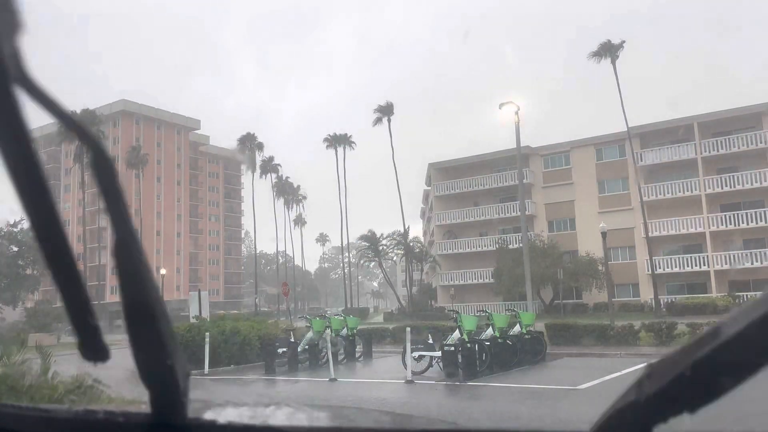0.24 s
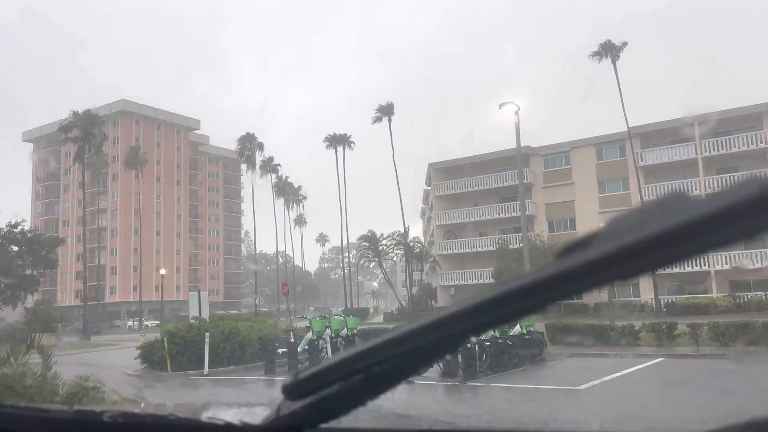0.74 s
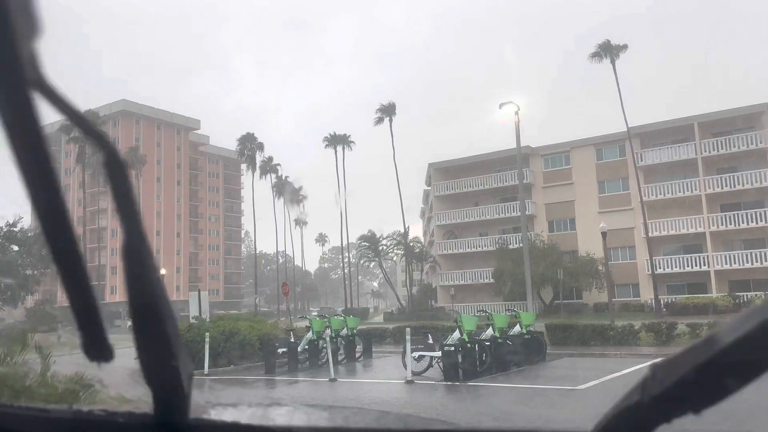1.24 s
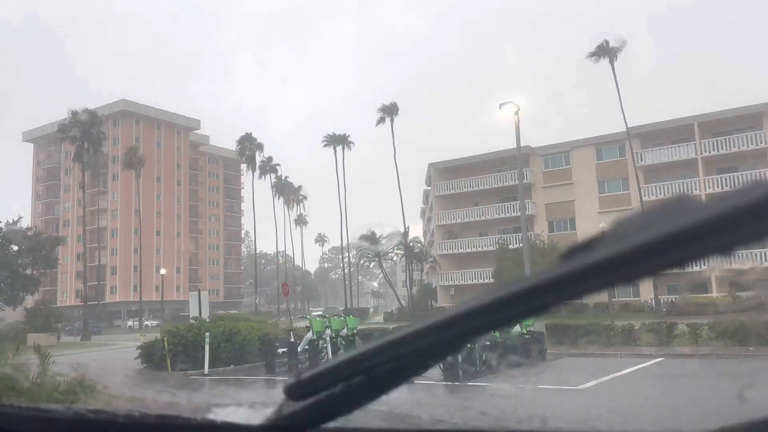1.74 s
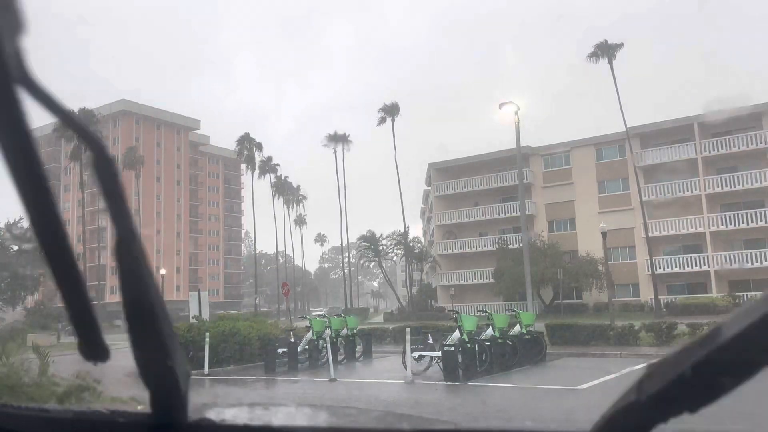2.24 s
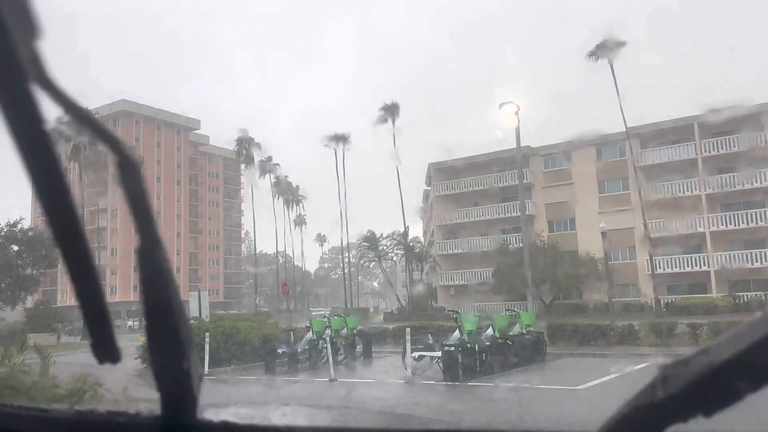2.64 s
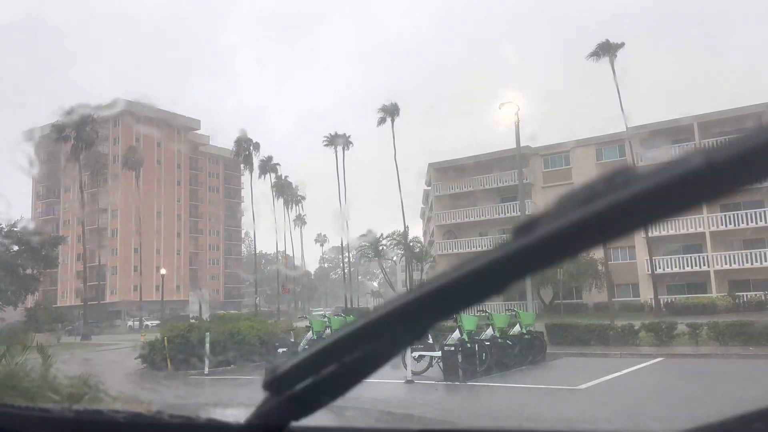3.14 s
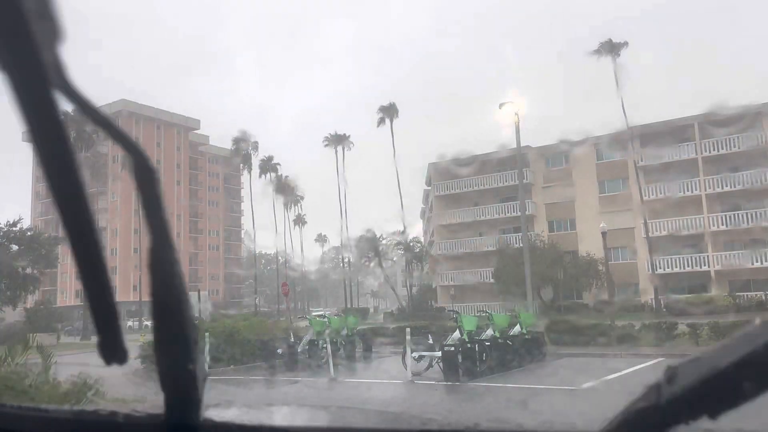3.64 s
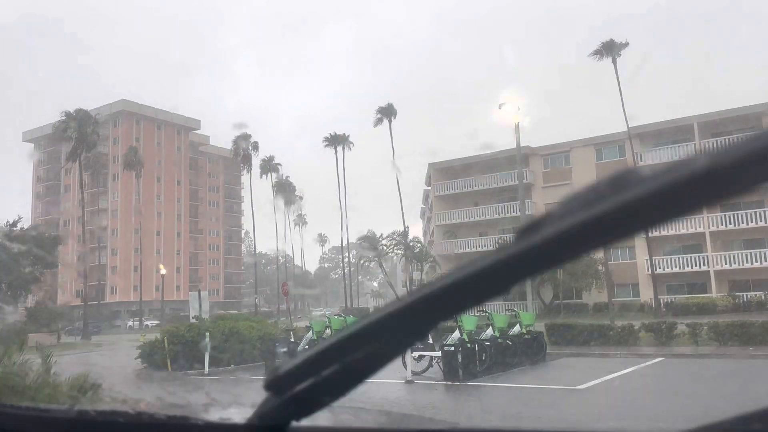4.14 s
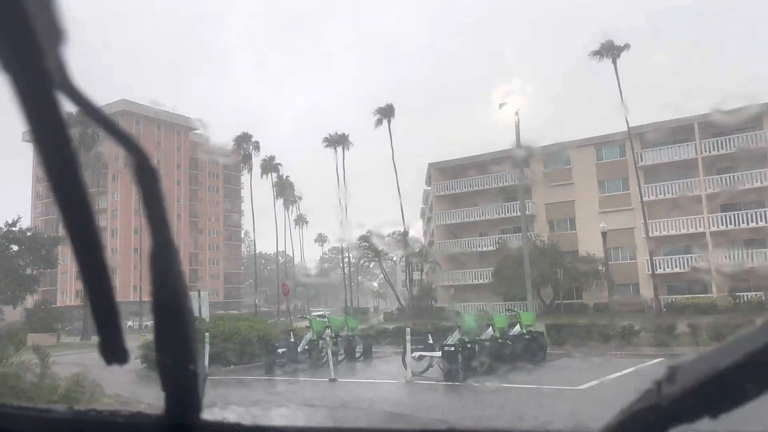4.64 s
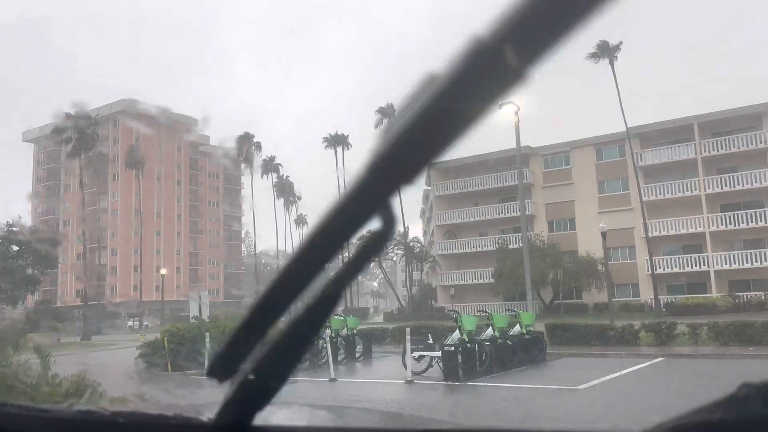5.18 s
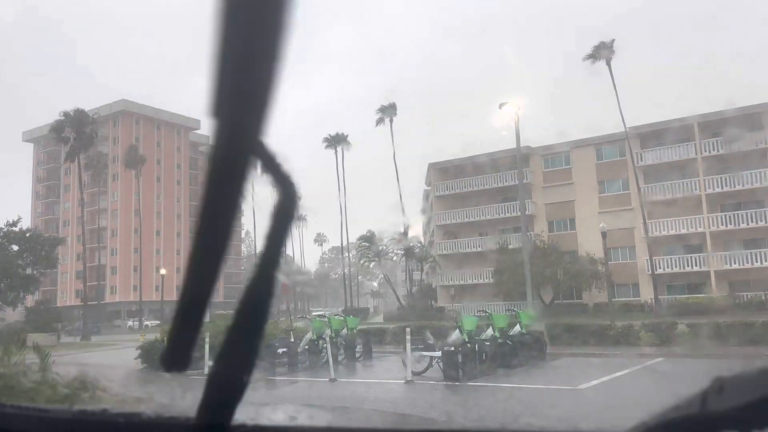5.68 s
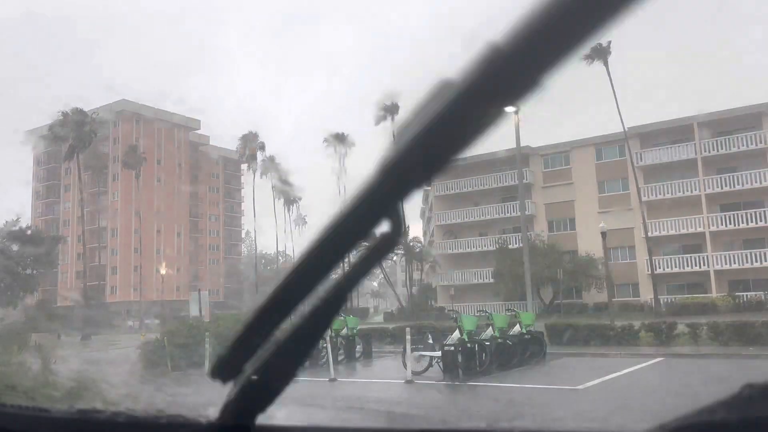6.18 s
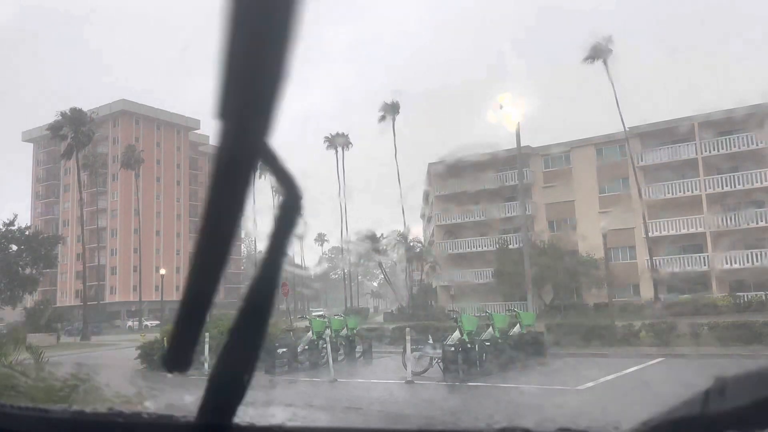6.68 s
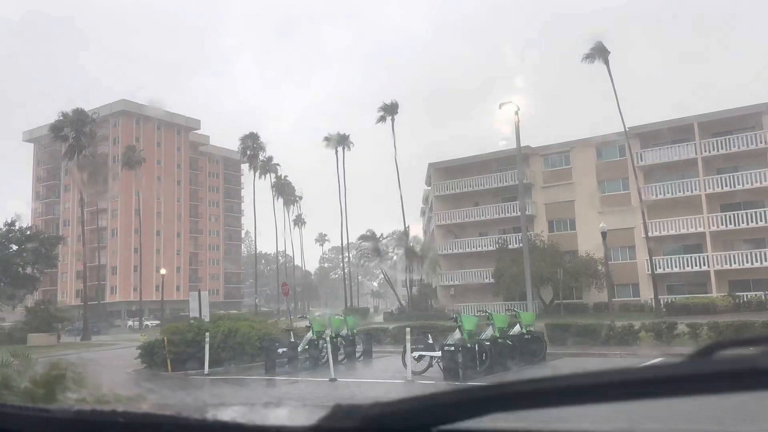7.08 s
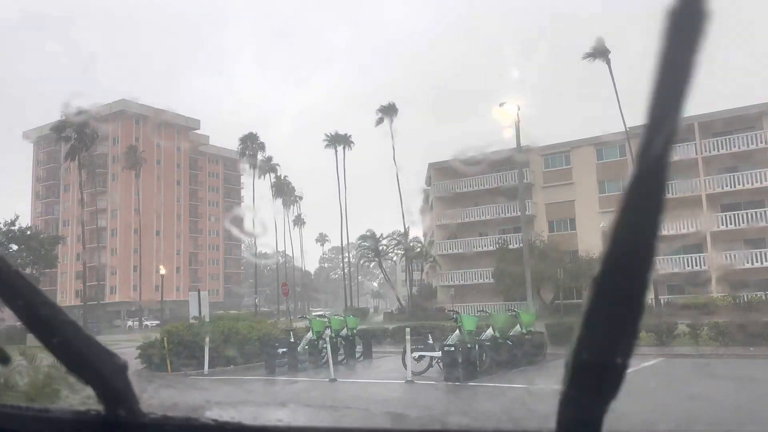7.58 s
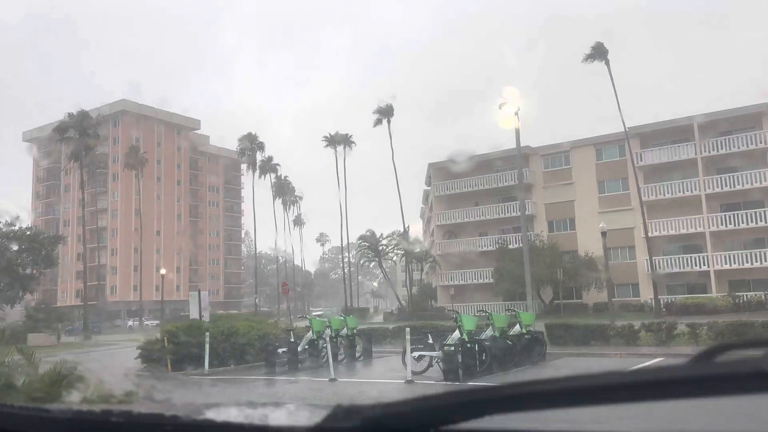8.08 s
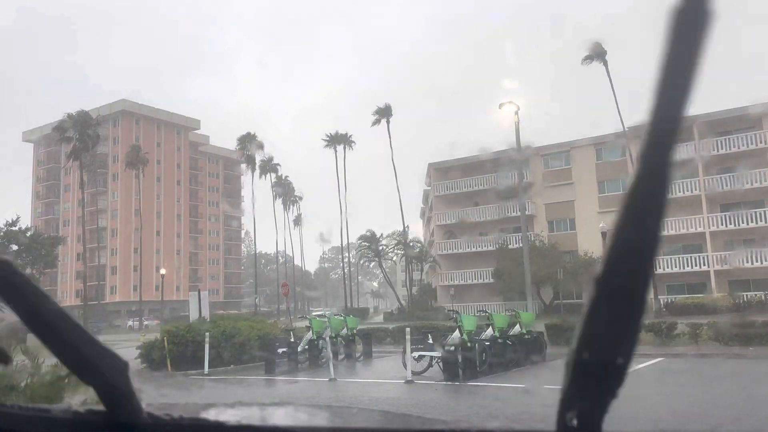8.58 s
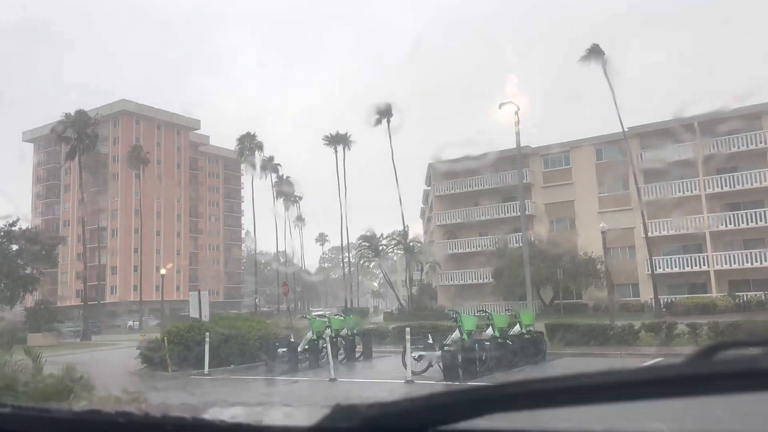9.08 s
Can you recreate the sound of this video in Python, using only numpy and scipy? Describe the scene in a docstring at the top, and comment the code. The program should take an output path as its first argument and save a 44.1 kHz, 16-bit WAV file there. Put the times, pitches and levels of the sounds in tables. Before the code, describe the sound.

Heavy rain is heard from inside a parked car for about nine seconds. A deep, steady drumming on the roof lies under a dense patter and soft hiss on the windshield, swelling slightly in gusts. Bigger drops tick on the glass at irregular moments, most thickly from 3 to 4 seconds, and some give short, light metallic pings. The wipers run the whole time, one cycle per second, with a low motor hum and shudder that rise in the middle of each sweep. The two blades turn at the top with a quick, dull double knock at about 0.5 seconds, 1.5 seconds and every second after, softer near 7.5 seconds. They land at the bottom with a rubbery thud at about 1 second, 2 seconds and so on until 9. The knocks stand out above the rain, and the whole sound is close and enclosed.

```python
"""Heavy rain drumming on the roof of a parked car, heard from inside, with wipers sweeping once a second.
Countless drops keep the roof's low modes sounding. On the windshield, fine rain hisses in gusts and
single drops tick and ring; some ping a thin panel, and a reedy band drifts in the drumming.
The wiper drive hums and shudders through the body. The blades knock as they reverse at the top,
then land with a rubber thud at the bottom."""
import sys
import numpy as np
from scipy import signal
from scipy.io import wavfile
from scipy.ndimage import uniform_filter1d

SR = 44100
rng = np.random.default_rng(int(sys.argv[2]) if len(sys.argv) > 2 else 0)


def dump(signal):
    """Clip the signal to [-1, 1] and save it as 16-bit WAV at the path in sys.argv[1]."""
    limited = np.clip(np.atleast_2d(signal).T, -1, 1)
    pcm = np.round(limited * 32767).astype(np.int16)
    wavfile.write(sys.argv[1], SR, pcm)


N = 411012
SWEEP_S = 0.99975  # one wiper cycle, up and down


# Roof and cabin spectrum: freq_hz, relative_db
ROOF_SPECTRUM = [(33, -40), (48, 0), (72, -7.5), (91, -13), (114, 2.5), (129, -1), (139, -1.5), (170, -7),
                 (198, -2), (233, -1), (280, -12), (340, -32), (450, -57), (800, -120)]

def roof_drumming():
    """Countless drops drive the low roof and cabin modes; the level swells once a sweep, just after the blades
    land."""
    size, frames = 4096, N // 1024 + 5
    hz, t = np.fft.rfftfreq(size, 1 / SR), np.arange(N) / SR
    field_db = at_freq(ROOF_SPECTRUM, hz) + 1.55 * smooth_noise(len(hz), frames, wide=3, long=2)
    drumming = unit_rms(stereo_noise(field_db, size)[:, :N])
    wobble = smooth_noise(1, frames * 2, wide=1, long=4)[0]
    wobble_db = 0.68 * np.interp(t, np.arange(frames * 2) * size / 8 / SR, wobble)
    swell_db = np.cos(2 * np.pi * (t - 0.17) / SWEEP_S)
    return amp(-27 + 0.071 * gust_db(t) + swell_db + wobble_db) * drumming


# Drive hum over one sweep: time_s, level_db, pitch_hz
HUM_CURVE = [(0.0, -46.0, 46.9), (0.12, -33.0, 48.5), (0.25, -39.0, 47.5), (0.37, -29.0, 49.9),
             (0.5, -24.0, 49.4), (0.62, -27.0, 46.8), (0.74, -32.0, 47.8), (0.87, -35.0, 46.4),
             (0.99, -40.0, 54.9)]
# Body shudder over one sweep: time_s, level_db, pitch_hz
SHUDDER_CURVE = [(0.0, -39.0, 59.0), (0.21, -32.0, 59.0), (0.35, -36.0, 51.0), (0.43, -29.0, 68.5),
                 (0.5, -39.0, 49.6), (0.57, -27.0, 58.3), (0.64, -26.0, 58.3), (0.71, -39.0, 56.7),
                 (0.78, -47.0, 70.7)]
# Strength of each sweep: hum_gain_db, shudder_gain_db, thud_gain_db
SWEEP_GAINS = [(-8, 1, -21), (-0.5, -1, -13.5), (0, 0, -13.5), (0.5, -1, -14), (0.5, 0.5, -16.5),
               (-1, 0.5, -28), (-1, 0, -16.5), (0.5, 1.5, -25), (-1, 0, -15), (-0.5, 1.5, -17)]

def wiper_sweeps():
    """The drive labours over a steady low tone; soft rubber thuds at the bottom of each sweep."""
    out = amp(-53) * np.sin(2 * np.pi * 24.01 * np.arange(N) / SR)
    hum, shudder = drone(HUM_CURVE), drone(SHUDDER_CURVE)
    t = np.arange(-2000, 2000) / SR  # centred on the thud's peak
    envelope = np.exp(-(t / 0.0042) ** 2) + 0.21 * np.exp(-(t / 0.037) ** 2)
    thud = envelope * np.cos(2 * np.pi * 106 * t)
    for sweep, (hum_db, shudder_db, thud_db) in enumerate(SWEEP_GAINS):
        cycle_s = sweep * SWEEP_S
        add(out, cycle_s - 0.39775, amp(hum_db) * hum)
        add(out, cycle_s - 0.32975, amp(shudder_db) * shudder)
        add(out, cycle_s + 0.058 + t[0], amp(thud_db) * thud)
    return out


def drone(curve):
    """One sweep of a wavering low tone."""
    time_s, level_db, pitch_hz = np.transpose(curve)
    t = np.arange(0, time_s[-1], 1 / SR)
    cycles = np.cumsum(np.interp(t, time_s, pitch_hz)) / SR
    envelope = np.interp(t, time_s, amp(level_db)) * signal.windows.tukey(len(t), 0.05)
    return envelope * np.sin(2 * np.pi * cycles)


# Two blades reversing at the top, one just after the other: start_s, level_db, pitch_hz
REVERSALS = [(0.431, -25, 221), (0.474, -19, 210), (1.441, -22, 197), (1.475, -22, 202), (2.449, -30, 247),
             (2.49, -18, 215), (3.457, -18.5, 192), (3.482, -17.5, 216), (4.429, -19, 232),
             (4.467, -29, 226), (5.427, -20, 231), (5.473, -18, 216), (6.453, -19, 211), (6.482, -23, 222),
             (7.44, -29, 224), (7.483, -31, 207), (8.439, -31, 200), (8.469, -20, 205)]
# Modes of a reversal: pitch_ratio, relative_db, t60_s
REVERSAL_MODES = [(1, 4, 0.08), (1.45, -8.5, 0.03)]
# Blades landing at the bottom: start_s, level_db
LANDINGS = [(0.997, -22), (1.999, -20), (3, -17), (4.004, -18.5), (4.997, -25), (6.002, -17.5),
            (7.002, -20.5), (8.005, -19.5), (9, -21.5)]
# Modes of a landing: pitch_ratio, relative_db, t60_s
LANDING_MODES = [(1, -3.5, 0.11), (1.6, -5.5, 0.046), (0.53, -4.5, 0.1)]

def blade_knocks():
    """Reversals jolt the body sharply; a landing blade settles slowly and its pitch sags."""
    out = np.zeros(N)
    for start_s, level_db, pitch_hz in REVERSALS:
        add(out, start_s, amp(level_db) * knock(REVERSAL_MODES, pitch_hz, rise_s=0.0016, sag=0))
    for start_s, level_db in LANDINGS:
        add(out, start_s, amp(level_db) * knock(LANDING_MODES, pitch_hz=234.4, rise_s=0.013, sag=0.18))
    return out


def knock(modes, pitch_hz, rise_s, sag):
    """Damped modes after one jolt, at peak 1."""
    t = np.arange(4000) / SR
    phase = 2 * np.pi * pitch_hz * np.cumsum(1 - sag * np.tanh(t / 0.042)) / SR
    ring = sum(amp(db - 60 * t / t60_s) * np.sin(ratio * phase) for ratio, db, t60_s in modes)
    ring *= 1 - np.exp(-t / rise_s)
    return ring / abs(ring).max()


# Rain strength on the glass: time_s, relative_db
GUSTS = [(0.0, -55), (0.93, -55), (1.14, -54), (1.35, -51), (1.53, -52.5), (1.95, -53.5), (2.4, -50),
         (2.55, -52), (2.9, -50), (3.4, -50), (3.9, -52.5), (4.02, -50.5), (4.15, -52.5), (4.49, -53),
         (4.88, -51.5), (5.11, -52.5), (5.3, -54.5), (5.73, -54.5), (6.02, -49), (6.33, -52.5), (6.55, -50),
         (6.88, -51), (7.21, -52.5), (7.71, -51), (7.95, -53), (8.36, -54), (8.88, -52.5), (9.05, -52),
         (9.32, -52.5)]

def gust_db(t):
    """Rain strength at times t, about its mean."""
    level_db = np.interp(t, *np.transpose(GUSTS))
    return level_db - level_db.mean()


# Spectrum of rain on glass: freq_hz, relative_db
GLASS_SPECTRUM = [(180, -36), (300, -1), (540, -6), (616, -5), (1050, -13.5), (1300, -7), (1800, -15),
                  (2250, -26), (2490, -22), (3930, -32.5), (5930, -37), (9350, -51), (10100, -55),
                  (22000, -120)]
# Cabin peaks and notches: centre_hz, width_hz, gain_db
CABIN_BANDS = [(824, 69, 3.5), (1060, 98, -1), (1350, 69, -1), (1528, 157, 3), (1743, 21, 1.5),
               (2304, 40, -10.5), (2410, 90, 2.5), (2870, 65, -2.5), (3110, 82, -1.5), (5570, 380, -2),
               (8650, 190, -3.5), (9560, 130, 4)]

def glass_db(hz):
    """Colour of rain on the glass as the cabin shapes it."""
    cabin_db = sum(db * np.exp(-((hz[:, None] - centre) / width) ** 2) for centre, width, db in CABIN_BANDS)
    return at_freq(GLASS_SPECTRUM, hz) + cabin_db


# Response of the hiss to gusts: freq_hz, gust_share
GUST_RESPONSE = [(400, 0.12), (1300, 0.59), (3000, 0.98), (9000, 0.97)]

def glass_hiss():
    """Fine rain blurs into hiss; squalls lift the treble most and flutter over wide bands."""
    size, frames = 512, N // 128 + 5
    hz, t = np.fft.rfftfreq(size, 1 / SR), np.arange(frames) * size / 4 / SR
    flutter_db = smooth_noise(1, frames, wide=1, long=9)
    band_flutter_db = 0.83 * smooth_noise(len(hz), frames, wide=30, long=6)
    squall_db = at_freq(GUST_RESPONSE, hz) * (gust_db(t) + flutter_db + band_flutter_db)
    drift_db = 1.05 * smooth_noise(len(hz), frames, wide=5, long=40)  # rain wanders across panels
    hiss = stereo_noise(glass_db(hz) + squall_db + drift_db, size)[:, :N]
    return amp(-35) * unit_rms(hiss)


# Decay of glass and cabin after a drop: freq_hz, t60_s
GLASS_DECAY = [(400, 0.12), (1500, 0.051), (4000, 0.077), (9000, 0.081)]
# Biggest drops on the glass: start_s, tick_db, ring_db
BIG_DROPS = [(0.983, -47, -36), (1.1927, -54, -44), (1.2316, -54, -42), (1.3633, -50, -42),
             (1.477, -55, -41), (1.8981, -48, -44), (2.1086, -51, -42), (2.2094, -53, -42),
             (2.6249, -50, -42), (2.8374, -55, -42), (2.958, -48, -34), (3.1303, -52, -42),
             (3.1537, -54, -42), (3.3638, -43, -32), (3.3852, -47, -42), (3.6027, -52, -42),
             (3.6984, -57, -34), (3.8267, -51, -42), (3.8601, -48, -46), (3.887, -47, -40),
             (3.9235, -51, -42), (3.929, -44, -43), (4.0462, -51, -44), (4.1664, -51, -41),
             (4.506, -58, -36), (4.799, -47, -37), (5.0759, -51, -45), (5.843, -47, -37),
             (5.8955, -52, -41), (6.1784, -49, -44), (6.4926, -51, -42), (6.526, -49, -42),
             (6.8937, -43, -43), (7.0219, -59, -40), (7.448, -51, -42), (7.707, -46, -35),
             (7.8266, -54, -40), (7.865, -48, -34), (8.102, -58, -38), (8.3714, -51, -39),
             (8.4048, -49, -41), (8.475, -47, -44), (8.5764, -49, -42), (8.8114, -54, -32),
             (9.076, -45, -37), (9.2564, -51, -41)]

def glass_patter(spots=10, drops_per_s=700):
    """Single drops strike spots on the glass; each spot has its own short ring through the cabin."""
    size = 512
    hz, t = np.fft.rfftfreq(size, 1 / SR), np.arange(36) * size / 4 / SR
    strength = amp(3.2 * np.minimum(rng.exponential(1, N), 5) + gust_db(np.arange(N) / SR))
    impacts = amp(-62) * unit_rms(strength * (rng.random(N) < drops_per_s / SR))
    spot_hit = rng.integers(0, spots, N)
    for start_s, _, ring_db in BIG_DROPS:
        impacts[round(start_s * SR)] = amp(ring_db)
    splat_db = 3.56 * np.log2(hz[:, None] / 1000 + 0.29)  # a wet slap is brighter than the hiss
    field_db = glass_db(hz) + splat_db - 60 * t / at_freq(GLASS_DECAY, hz)
    out = np.zeros((2, N))
    for spot in range(spots):
        ring = stereo_noise(field_db, size)
        ring_t = np.arange(ring.shape[1]) / SR
        ring *= 1 - np.exp(-ring_t / 0.00046)  # water spreads before it loads the glass
        hits = impacts * (spot_hit == spot)
        out += signal.oaconvolve(hits[None], ring / abs(ring).max(), axes=1)[:, :N]
    return out


def glass_ticks(small_per_s=8.1, clink_hz=2800, clink_t60_s=0.012):
    """A drop's first touch: bright click, clink of glass, brief spray. Small drops fall at random."""
    t, out = np.arange(800) / SR, np.zeros((2, N))
    bright_band = signal.butter(2, [3200, 9200], "band", fs=SR)
    click_envelope = (t / 0.001) ** 2 * np.exp(-t / 0.0004)
    spray_envelope = 0.015 * np.exp(-t / 0.006) * (t > 0.002)
    clink_t = np.maximum(t - 0.0024, 0)
    clink_envelope = amp(3 - 60 * clink_t / clink_t60_s)
    gaps, sizes = rng.exponential(1, (120, 2)).T
    small_drops = zip(np.cumsum(gaps) / small_per_s, -63 + 3 * np.minimum(sizes, 3))
    drops = [row[:2] for row in BIG_DROPS] + [row for row in small_drops if row[0] < N / SR]
    for start_s, tick_db in drops:
        noise = rng.standard_normal((3, len(t)))  # common, left, right
        burst = (noise[0] + 0.5 * noise[1:]) * (click_envelope + spray_envelope)
        click = signal.lfilter(*bright_band, burst)
        pitch_hz = clink_hz * (1 + 0.04 * noise[0, 0])
        clink = clink_envelope * np.sin(2 * np.pi * pitch_hz * clink_t)
        tick = click / abs(click.mean(0)).max() + clink
        for channel, sound in zip(out, tick):
            add(channel, start_s + 0.001, amp(tick_db) * sound)
    return out


# Drops on a thin panel: start_s, level_db, pitch_hz
PANEL_DROPS = [(0.7906, -31, 1280), (0.8475, -33, 1320), (1.46, -32, 1280), (1.53, -32, 1230),
               (1.77, -38, 1340), (1.82, -32, 1290), (2.2426, -30, 1280), (2.2997, -41, 1360),
               (2.589, -31, 1360), (2.7495, -31, 1300), (3.39, -30, 1300), (3.98, -32, 1455),
               (4.045, -35, 1350), (4.19, -32, 1270), (4.8808, -36, 1270), (5.03, -37, 1310),
               (5.2709, -34.5, 1290), (6.0367, -31, 1310), (6.557, -36, 1266), (6.7233, -31, 1295),
               (6.97, -31.5, 1350), (7.124, -33, 1320), (8.372, -33, 1380), (9.0848, -31.5, 1350)]

def panel_pings(rise_s=0.00097, t60_s=0.039):
    """A struck thin panel gives a short metallic ring, a little stronger on the right."""
    t, out = np.arange(2500) / SR, np.zeros(N)
    envelope = (1 - np.exp(-t / rise_s)) * amp(-60 * t / t60_s)
    envelope /= envelope.max()
    for start_s, level_db, pitch_hz in PANEL_DROPS:
        add(out, start_s, amp(level_db) * envelope * np.sin(2 * np.pi * pitch_hz * t))
    return out * amp([[-4], [-1.5]])


# Reedy band in the rain: time_s, pitch_hz, level_db
REED_CURVE = [(0.0, 1304, -53), (0.25, 1394, -49), (0.5, 1284, -52), (0.8, 1326, -50), (1.2, 1350, -52),
              (1.5, 1300, -51), (1.62, 1290, -54), (1.8, 1313, -39.5), (1.95, 1280, -51), (2.15, 1276, -46),
              (2.75, 1293, -48.5), (3.35, 1260, -50), (3.85, 1294, -61), (4.03, 1397, -43),
              (4.2, 1280, -48), (4.65, 1300, -57), (4.96, 1320, -42.5), (5.3, 1320, -56), (5.85, 1350, -58),
              (6.0, 1300, -44), (6.42, 1316, -53), (6.53, 1263, -41), (6.83, 1360, -54),
              (6.98, 1307, -41.5), (7.15, 1300, -53), (7.55, 1323, -49.5), (8.7, 1290, -57),
              (9.32, 1333, -43)]

def reedy_band(width_hz=50, wander_hz=22):
    """A narrow band of rain noise that swells and drifts in pitch."""
    size, frames = 2048, N // 512 + 5
    hz, t = np.fft.rfftfreq(size, 1 / SR), np.arange(frames) * size / 4 / SR
    time_s, pitch_hz, level_db = np.transpose(REED_CURVE)
    centre_hz = np.interp(t, time_s, pitch_hz) + wander_hz * smooth_noise(1, frames, wide=1, long=8)
    detuning = (hz[:, None] - centre_hz) / width_hz
    band = unit_rms(stereo_noise(-20 * np.log10(1 + detuning ** 2), size)[:, :N])
    return amp(np.interp(np.arange(N) / SR, time_s, level_db)) * band


# Left-right likeness: freq_hz, coherence
STEREO_COHERENCE = [(60, .85), (260, .96), (430, .3), (600, .68), (670, .4), (850, .78), (1070, .28),
                    (1350, .66), (1650, .6), (1850, .86), (2220, .25), (2420, .82), (2800, .1), (3350, .7),
                    (4100, .08), (5000, .12), (5800, .58), (6600, .15), (7400, .4), (8500, .1), (9800, .68)]
# Phase of left ahead of right: freq_hz, lead_rad
LEFT_LEAD = [(60, .2), (300, .25), (520, -1.3), (1000, -2), (1300, -1.4), (1600, -3.2), (1750, -5.3),
             (2050, -5.4), (2300, -7.1), (3100, -5.2), (3500, -5.6), (6000, -6.4), (7000, -4.1),
             (8000, -7.5), (10200, -9.2)]
# Level of left over right: freq_hz, balance_db
LEFT_BALANCE = [(60, -2.5), (95, 7.5), (150, 5.5), (240, 6.5), (300, 1.5), (410, 8.5), (580, 2.5), (690, 2),
                (800, -1.5), (1100, -3), (1400, -4), (1700, 0), (2350, -2), (2750, 5), (3820, 2), (4700, 7),
                (5700, 0), (7300, 3), (8400, -5.5), (10000, -1.5)]

def stereo_noise(field_db, size):
    """Partly coherent stereo noise, shaped by a bins x frames level field."""
    hz = np.fft.rfftfreq(size, 1 / SR)
    draws = rng.standard_normal(field_db.shape[::-1] + (4,)).T
    left, independent = draws[0] + 1j * draws[1], draws[2] + 1j * draws[3]
    coherence = np.clip(at_freq(STEREO_COHERENCE, hz), 0, 1)
    lagged = left * np.exp(-1j * at_freq(LEFT_LEAD, hz))
    right = coherence * lagged + np.sqrt(1 - coherence ** 2) * independent
    balance = amp(at_freq(LEFT_BALANCE, hz) / 2)
    spectra = np.array([left * balance, right / balance]) * amp(field_db)
    return signal.istft(spectra, nperseg=size, noverlap=size * 3 // 4)[1]


def smooth_noise(bins, frames, wide, long):
    """Random field at rms 1, smoothed over `wide` bins and `long` frames."""
    noise = rng.standard_normal((frames, bins)).T
    return unit_rms(uniform_filter1d(uniform_filter1d(noise, wide, axis=0), long, axis=1))


def amp(db):
    """Decibels to gain."""
    return 10 ** (np.asarray(db) / 20)


def unit_rms(x):
    """Scales to rms 1."""
    return x / np.sqrt(np.mean(x ** 2) + 1e-20)


def at_freq(table, hz):
    """Interpolates a table on a log-frequency axis; returns a column."""
    freq_hz, value = np.transpose(table)
    return np.interp(np.log(hz + 1), np.log(freq_hz + 1), value)[:, None]


def add(mix, start_s, sound):
    """Adds a sound to the mix; any overhang is cut."""
    start = round(start_s * SR)
    part = mix[max(start, 0):][:len(sound) + min(start, 0)]
    part += sound[max(-start, 0):][:len(part)]


def scene():
    """Rain on roof and glass, plus wipers a little louder on the left than on the right."""
    rain = roof_drumming() + glass_hiss() + glass_patter() + glass_ticks() + panel_pings() + reedy_band()
    wipers = wiper_sweeps() + blade_knocks()
    return rain + wipers * amp([[0.8], [-0.8]])


def record(dry):
    """Low-pass at 10.2 kHz."""
    lowpass = signal.firwin(801, 10200, window=("kaiser", 9), fs=SR)
    return signal.oaconvolve(dry, lowpass[None], "same")


dry = scene()
out = record(dry)
dump(out)
```